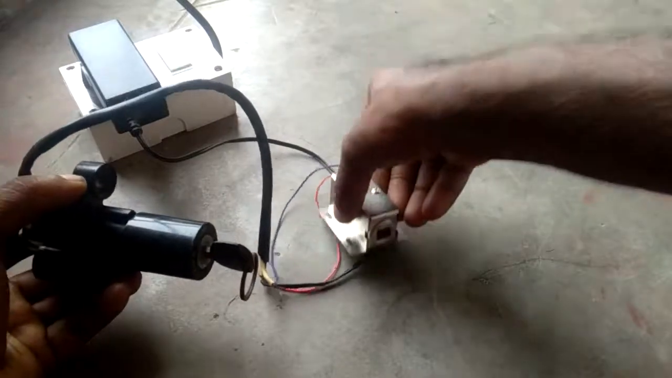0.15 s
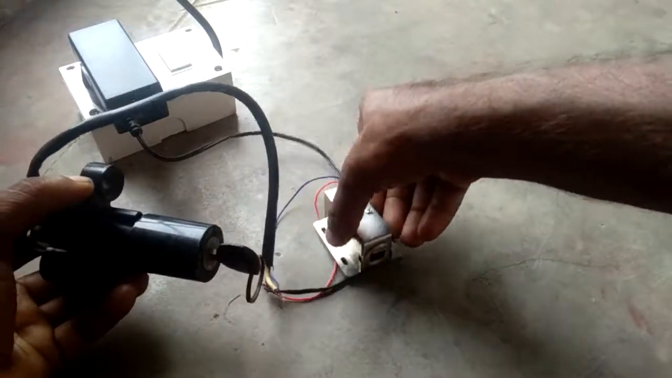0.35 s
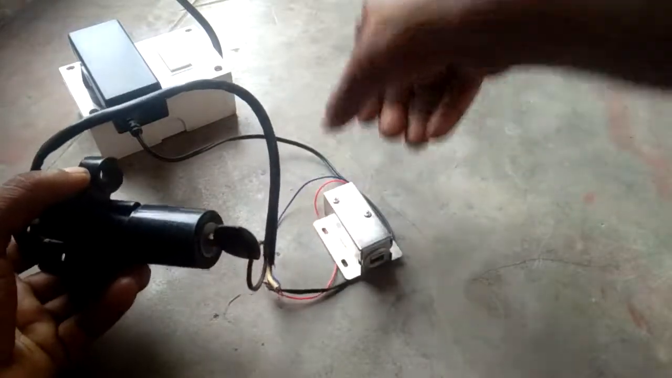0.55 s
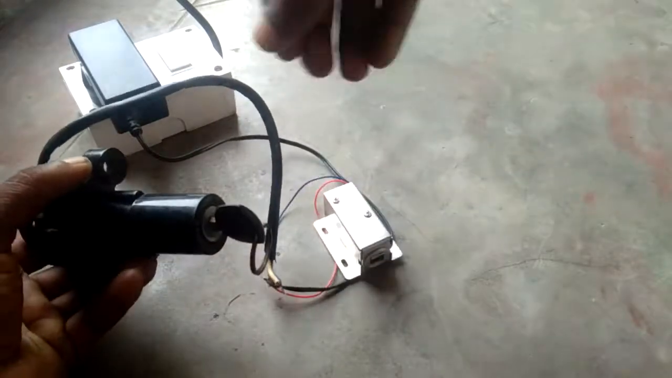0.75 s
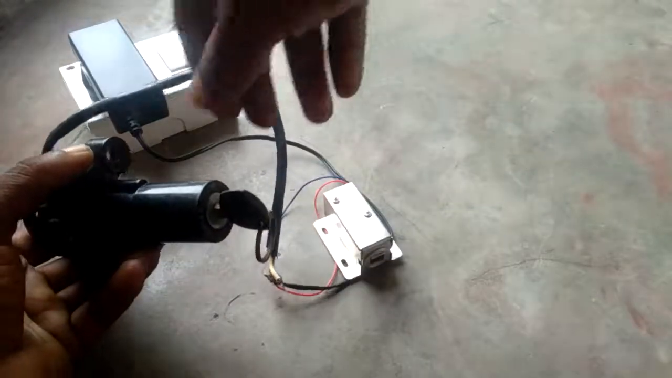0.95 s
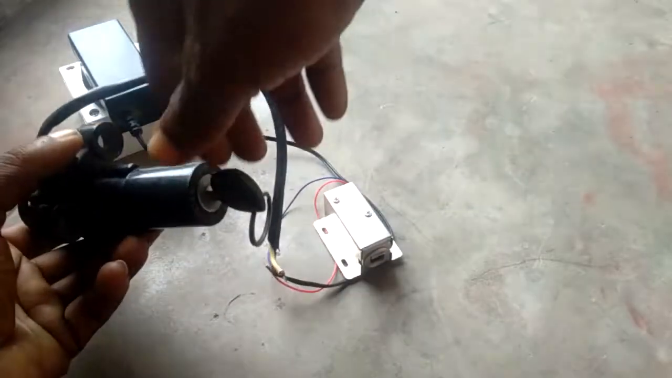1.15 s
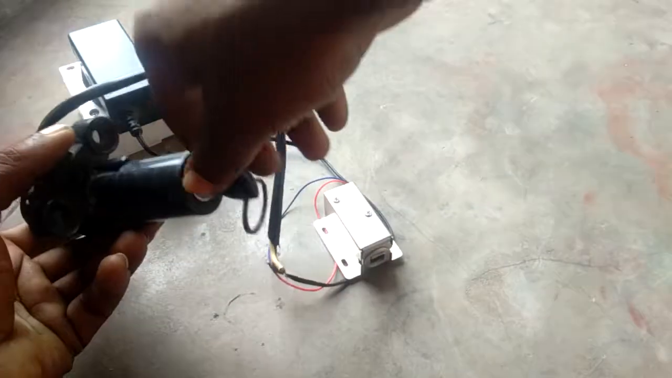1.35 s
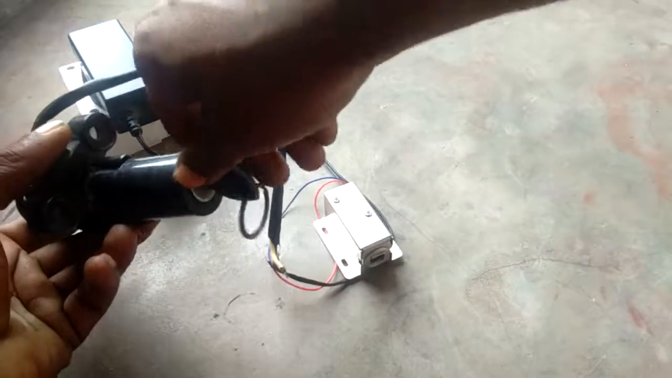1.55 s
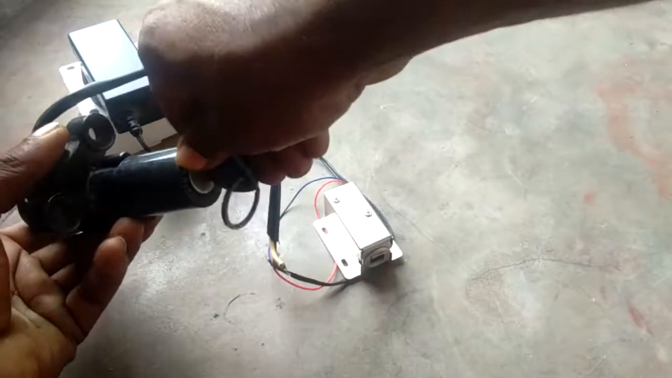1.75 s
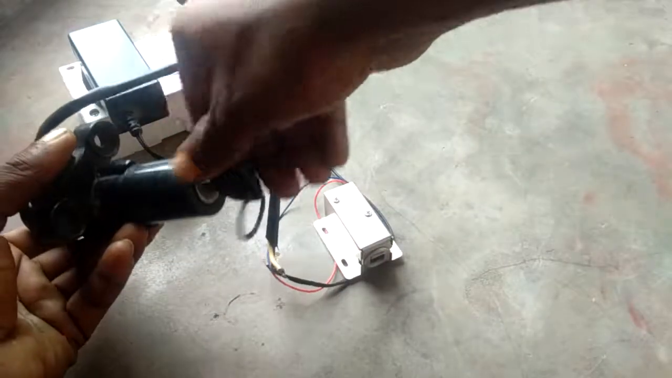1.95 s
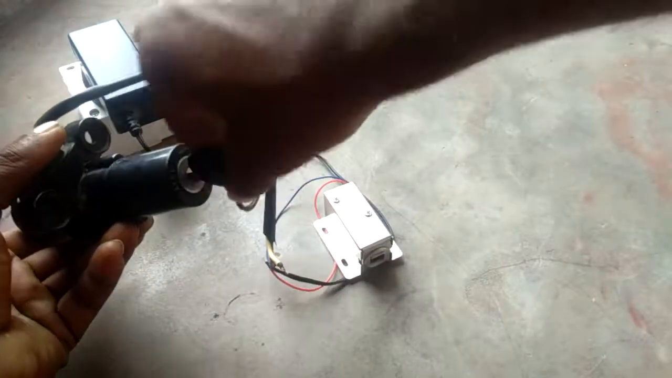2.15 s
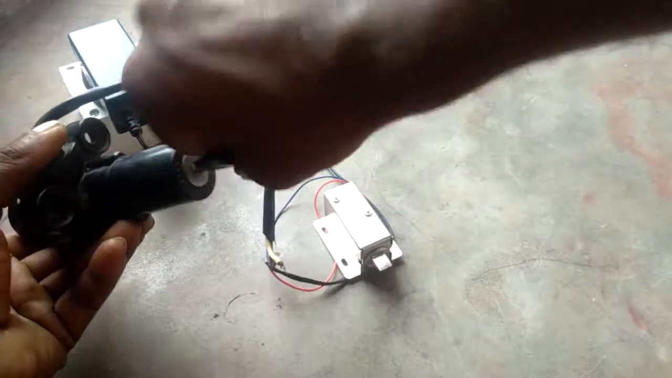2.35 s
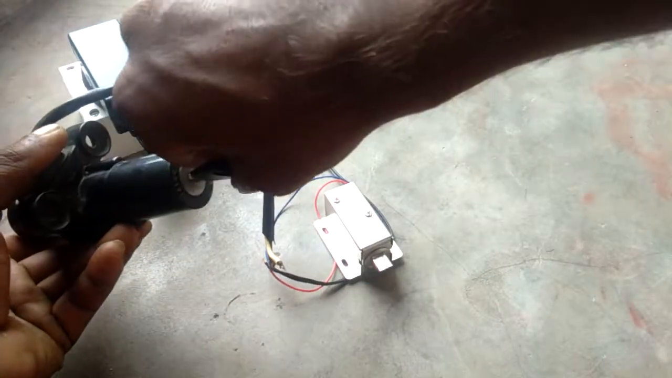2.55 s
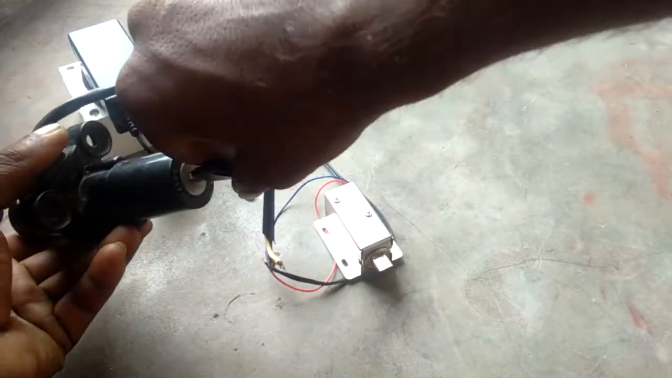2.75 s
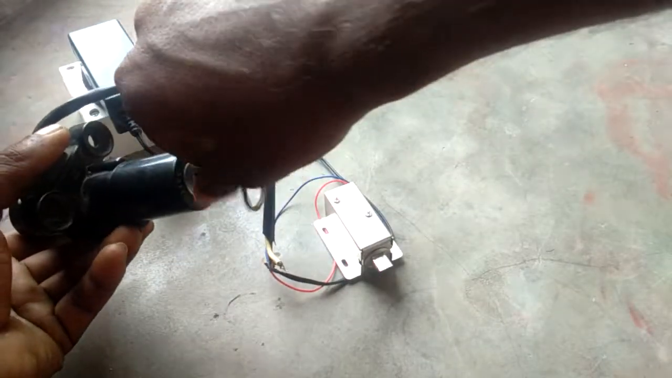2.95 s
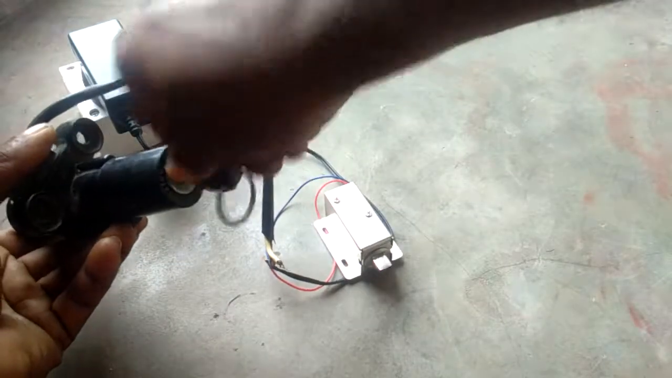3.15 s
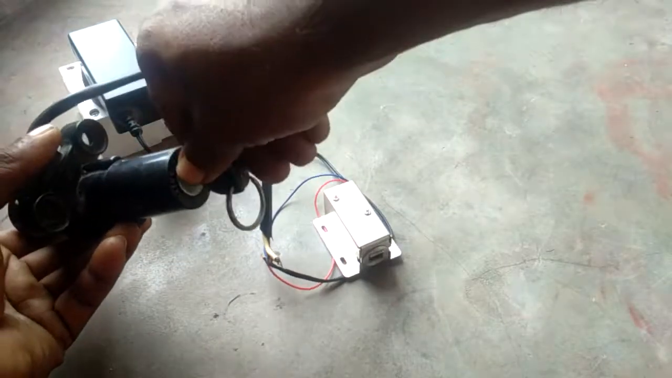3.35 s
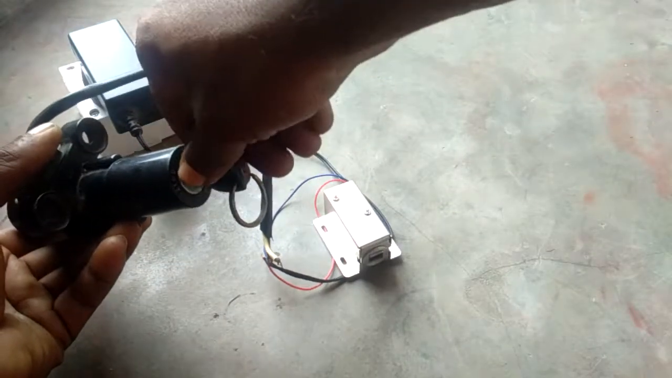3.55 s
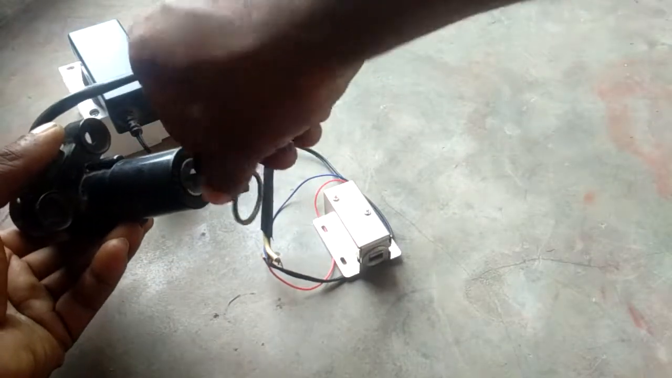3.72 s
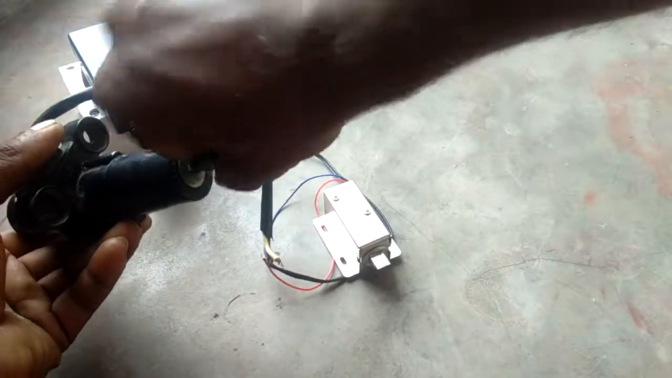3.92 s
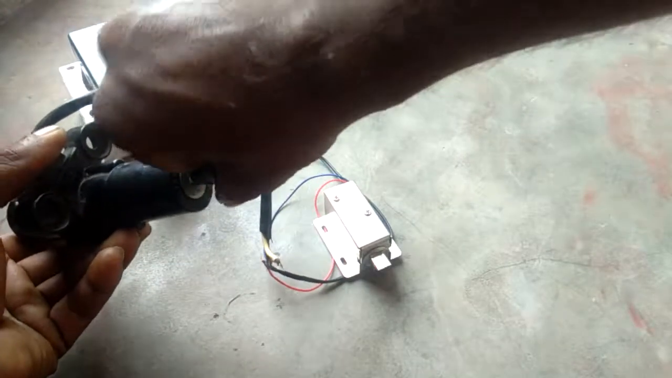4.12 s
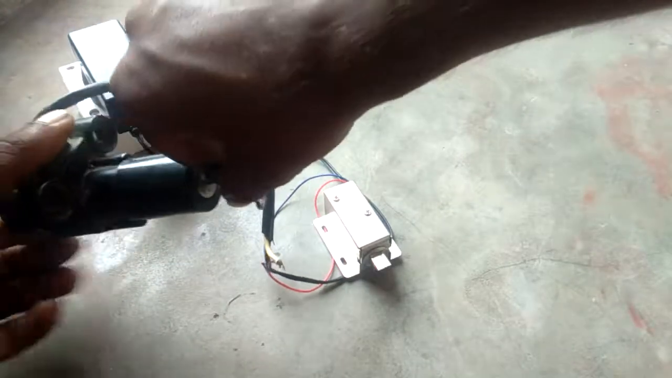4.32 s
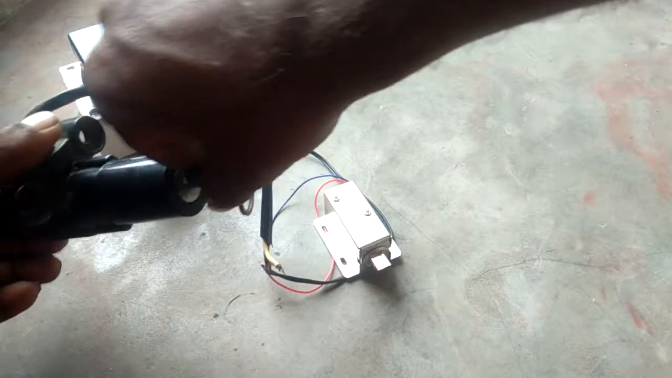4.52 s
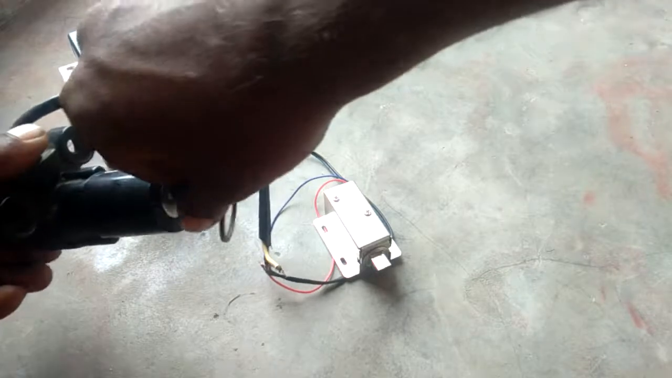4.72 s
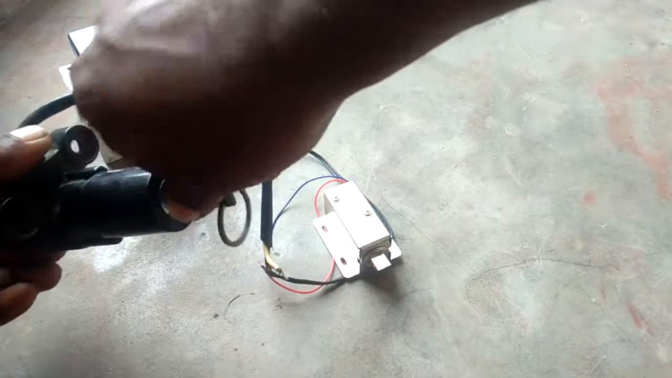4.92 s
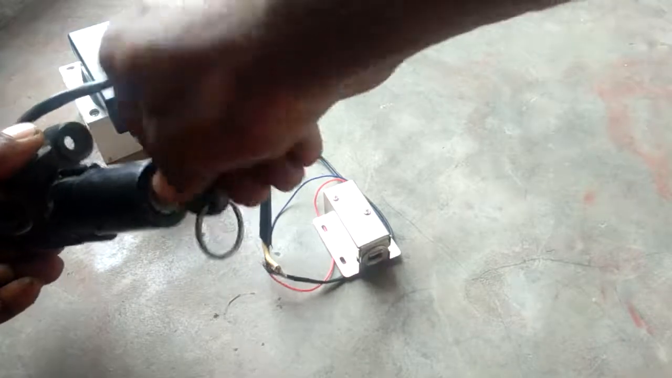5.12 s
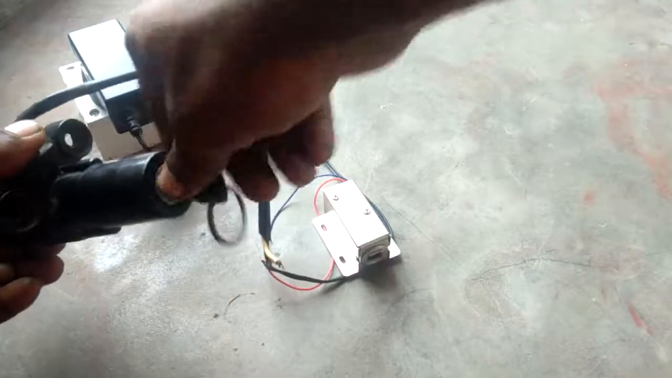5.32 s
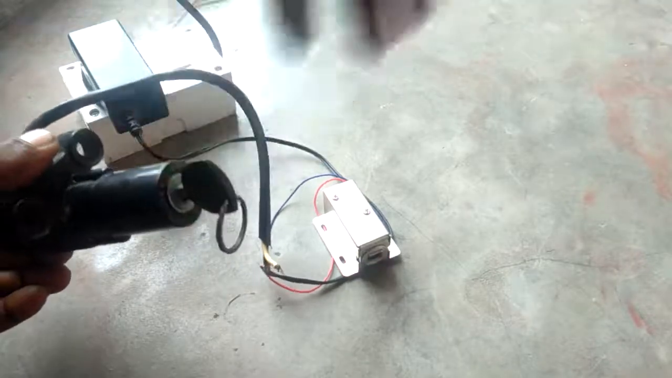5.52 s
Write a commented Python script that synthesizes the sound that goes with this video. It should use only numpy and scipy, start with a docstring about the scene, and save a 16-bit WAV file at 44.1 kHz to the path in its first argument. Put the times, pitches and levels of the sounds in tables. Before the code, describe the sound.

A small metal solenoid lock is set down on concrete, then its bolt snaps out and in twice with sharp clacks over a fan's hum.

```python
"""A fan-like rush (shaped noise) and a wavering mains hum (sines with random swing) run throughout.
A small solenoid lock is set down on a concrete floor, then a faint far tone swells and fades.
A key switch is turned off and on twice: it ticks (noise through barrel resonances), and a moment later
the bolt springs out or slams in, ringing the steel case (decaying modes and a crack) in a bare room."""
import sys
import numpy as np
from scipy import signal
from scipy.fft import rfft, irfft, next_fast_len
from scipy.io import wavfile
from scipy.ndimage import uniform_filter1d, map_coordinates

SR = 44100
rng = np.random.default_rng(int(sys.argv[2]) if len(sys.argv) > 2 else 0)


def waveform_to_disk(signal):
    """Save audio, clipped to [-1, 1], as 16-bit WAV at the path in sys.argv[1]."""
    frames = np.transpose(np.atleast_2d(signal))
    scaled = np.clip(frames, -1, 1) * 32767
    samples = np.round(scaled).astype(np.int16)
    wavfile.write(sys.argv[1], SR, samples)


def linear_from_db(decibels):
    """Turn decibels (scalar or array-like) into linear amplitude factors; 0 gives 1."""
    return 10 ** (np.asarray(decibels, float) / 20)


N = 250488
T = np.arange(N) / SR

# ringing of the lock case: (frequency [Hz], t60 before RING_SHARE [s],
# level struck by bolt springing out [dB], by bolt slamming in [dB], by floor [dB])
CASE_MODES = [(1020, 0.016, -21, -16.5, -4), (1756, 0.0077, -6, -0.5, 6), (2346, 0.05, 2, -6, -21),
              (2424, 0.052, 3, -1.5, -7), (2798, 0.024, -1, -4.5, 4), (3340, 0.24, -14.5, -10.5, -16),
              (3422, 0.12, -11, -10, -9), (3447, 0.035, -1, -0.5, 0), (3920, 0.03, -24, -17, -14),
              (4320, 0.028, -3, -6.5, -20), (4470, 0.057, -24, -1.5, -15), (5145, 0.024, -34, -12, -19),
              (5570, 0.072, -11, -3.5, -22), (5970, 0.024, -19, 1, -19), (6220, 0.033, -18, -0.5, -7.5),
              (6660, 0.054, -13.5, -7.5, -25), (7160, 0.02, -23, 1, -14), (7970, 0.02, -11, -3.5, -3),
              (8930, 0.064, -11, -5.5, -12), (10120, 0.01, -22, -16, -23), (10600, 0.024, -18.5, -7.5, -13),
              (10640, 0.029, -18.5, -13, -4), (11700, 0.032, -8, -3.5, 2.5), (12420, 0.024, -8, -2, -12),
              (13400, 0.027, -6, -11, 0), (14550, 0.03, -13, -11, -3), (14400, 0.027, -12, -5, -10)]
# where the case is struck, in the order of its level columns
PLACES = ["out", "in", "floor"]
# crack of a contact, by place: (level against the ring [dB], t60 [s])
CRACK = {"out": (-22.5, .0115), "in": (1.1, 0.0082), "floor": (6, 0.0076)}
# share of each mode's t60, by place [1]; the fingers damp the case as it is set down
RING_SHARE = {"out": 1.02, "in": 0.96, "floor": 0.67}
# strokes of the bolt: (landing time [s], way, blow [dB], first snap of key switch [dB], second snap [dB])
STROKES = [(2.4982, "out", -19, -20, -21.5), (3.3233, "in", -17.5, -25, -26),
           (4.0609, "out", -18, -21, -18.5), (5.257, "in", -17.5, -28, -17)]
# bolt travel time, by way [s]
TRAVEL_S = {"out": .0173, "in": .0277}
# chatter of a landing, by way: (time after landing [s], level against the blow [dB], brightness [dB/octave])
CHATTER = {"out": [(0, -4, 0.5), (.002, 0.9, -1), (.0055, -9.5, -1), (.016, -7, -.4)], "in": [(0, 1, 1.1),
           (.0026, -3.5, -6), (.0045, -10, -0.5), (.007, -8, -0.3), (.017, -15.5, -3)]}
# lock touching the floor: (time [s], level [dB], brightness [dB/octave])
FLOOR_TAPS = [(0.304, -48, -3), (.3427, -51, -4.5), (.3575, -52, -7), (0.3726, -38.5, 0.7),
              (0.3743, -43, -6), (.3822, -42.5, -2), (0.3888, -43, -1.8), (.393, -56, -5), (.521, -63, -6),
              (.5757, -48, -5)]
# resonances of the switch barrel: (frequency [Hz], width [Hz], level [dB])
BARREL_MODES = [(1740, 400, 0.5), (2400, 124, 12.5), (5500, 550, 2), (6920, 810, -0.5), (10570, 3500, -12),
                (13600, 2200, -12)]
# friction while the bolt travels, by way: level before grit flutter [dB]
SLIDE_DB = {"out": -47, "in": -46.5}
# decay of the room: (frequency [Hz], t60 [s])
ROOM_T60 = [(1000, 0.3), (2500, 0.47), (5000, 0.5), (10000, 0.4), (15000, .25)]
# spectrum of the rush, before scaling to RUSH_DB: (frequency [Hz], relative density [dB])
RUSH_SPECTRUM = [(13, -61), (25, -29), (60, -7.5), (105, -8), (174, -11.5), (236, -14.5), (554, -16.5),
                 (710, -24), (815, -19), (1230, -20), (2600, -33), (6440, -48), (8720, -56), (14700, -58),
                 (16000, -61.5)]
# mains hum and drones: (frequency [Hz], rms before throb [dB], wavering width [Hz],
# steady share of power [0-1], throb depth [0-1])
HUM_LINES = [(50.7, -63, 7.8, 0.7, 0.1), (64.9, -58.5, 5, .6, 0.12), (100.9, -44, 6, 0.94, 0.67),
             (111.9, -51, 8, 0.35, 0.05), (150.7, -59, 9.9, 0.49, 0.), (200.1, -50.5, 10, .5, 0.01),
             (211.2, -53.5, 5.7, 0.89, 0.), (610, -54, 130, 0., 0.)]

SNAP_GAP_S, SNAP_S = 0.0035, 0.0021  # between the two snaps; full scrape of each, before its decay
CREEP_S, CREEP_DB = 0.006, -49  # the key rubs before it turns the current off; level before flutter
ROOM_DB = -7.0
TONE_PEAK_S, TONE_DB = 1.28, -51.5  # level before fuzz
TONE_HZ, TONE_SAG_HZ_PER_S = 1870, 320  # pitch at the peak; how it sags to either side
TONE_RISE_DB_PER_S, TONE_HOLD_S, TONE_FADE_DB_PER_S = 150, 0.08, 70
RUSH_DB = -45.5  # rms in the 300-1000 Hz band
THROB_HZ = 5.1  # the fan's turning beats in the hum


def unit(x):
    """Scaled to rms 1."""
    return x / np.sqrt(np.mean(x ** 2) + 1e-20)


def along(points, hz):
    """(Hz, value) points read on a log axis."""
    point_hz, value = np.transpose(points)
    return np.interp(np.log(hz + 1), np.log(point_hz + 1), value)


def filtered(x, response):
    """x through a complex response of frequency."""
    size = next_fast_len(len(x) + 8192)
    return irfft(rfft(x, size) * response(np.fft.rfftfreq(size, 1 / SR)), size)[:len(x)]


def wobble(rate_hz):
    """Smooth random curve of rms 1."""
    return unit(map_coordinates(rng.standard_normal(N // 50), [T * rate_hz + 2]))


def tilt(hz, db_per_octave):
    """Gain that pivots about 4 kHz."""
    return linear_from_db(db_per_octave * np.log2((hz + 1) / 4000))


def bass_cut(hz, corner_hz):
    """Second-order high-pass response."""
    return (1j * hz / (1j * hz + corner_hz)) ** 2


def add(track, time_s, sound):
    """Mixes a sound in at time_s."""
    part = track[round(time_s * SR):][:len(sound)]
    part += sound[:len(part)]


def blows():
    """Each contact rings the case modes afresh and cracks briefly."""
    track, t, modes = np.zeros(N), T[:SR // 4], np.array(CASE_MODES)
    hz, t60_s = modes[:, :1], modes[:, 1:2]
    # loose parts buzz against the case and blur each mode, the high ones most
    blur_hz = np.minimum(0.03 * (hz / 1000) ** 5, 350)
    contacts = [(time_s, "floor", db, slope_db) for time_s, db, slope_db in FLOOR_TAPS]
    for land_s, way, blow_db, *_ in STROKES:
        for late_s, relative_db, slope_db in CHATTER[way]:
            contacts.append((land_s + late_s, way, blow_db + relative_db, slope_db))
    for time_s, place, db, slope_db in contacts:
        crack_db, crack_t60_s = CRACK[place]
        chance = rng.standard_normal((len(modes), 2))  # level [dB], half phase [rad]
        mode_db = modes[:, [2 + PLACES.index(place)]] + chance[:, :1]
        decay_db = -60 * t / (t60_s * RING_SHARE[place])
        size = linear_from_db(mode_db + decay_db) * tilt(hz, slope_db)
        drift = np.cumsum(rng.standard_normal(size.shape), axis=1) * np.sqrt(2 * np.pi * blur_hz / SR)
        ring = np.sum(size * np.sin(2 * np.pi * hz * t + 2 * chance[:, 1:] + drift), axis=0)
        ring = ring * (1 - np.exp(-t / 0.0002))
        crack = linear_from_db(crack_db - 60 * t / crack_t60_s) * rng.standard_normal(len(t))
        # a small object radiates no bass
        crack = filtered(crack, lambda f: bass_cut(f, 1500) * tilt(f, slope_db))
        add(track, time_s, linear_from_db(db) * (ring + crack))
    return track


def barrel(hz):
    """Sum of barrel resonances with alternating sign."""
    total = 0
    for k, (center_hz, width_hz, db) in enumerate(BARREL_MODES):
        damping = 1j * hz * width_hz
        total = total + (-1) ** k * linear_from_db(db) * damping / (center_hz ** 2 - hz ** 2 + damping)
    return total


def key_switch():
    """Two noise scrapes ring the barrel before each stroke, a dull snap then a brighter one."""
    track, t = np.zeros(N), T[:SR // 20]
    scrape = np.clip(t / 0.0006, 0, 1) * np.exp(-np.clip(t - SNAP_S, 0, 1) / 0.0012)
    for land_s, way, _, first_db, second_db in STROKES:
        for late_s, db, slope_db in [(0, first_db, -0.8), (SNAP_GAP_S, second_db, 0.3)]:
            noise = scrape * rng.standard_normal(len(t))
            snap = filtered(noise, lambda f: barrel(f) * tilt(f, slope_db))
            add(track, land_s - TRAVEL_S[way] + late_s, linear_from_db(db) * snap)
    return track


def slides():
    """Friction of moving parts: bright noise with gritty flutter."""
    spans = []
    for land_s, way, *_ in STROKES:
        start_s = land_s - TRAVEL_S[way]
        spans.append((start_s, land_s, SLIDE_DB[way]))
        if way == "out":
            spans.append((start_s - CREEP_S, start_s, CREEP_DB))
    level = np.zeros(N)
    for a, b, db in spans:
        level += linear_from_db(db) * np.interp(T, [a, a + 0.0022, b, b + 0.0022], [0, 1, 1, 0])
    grit = filtered(rng.standard_normal(N), lambda f: bass_cut(f, 2500) * tilt(f, -1.5))
    return level * linear_from_db(3.6 * wobble(400)) * unit(grit)


def room(x):
    """Diffuse answer of bare walls, each frequency dying at its own speed; a new tail each half second."""
    wet, step = np.zeros(N), SR // 2
    for start in range(SR // 5, N, step):
        hz, t, z = signal.stft(rng.standard_normal(SR // 2), SR, nperseg=256)
        decay = linear_from_db(-60 * t / along(ROOM_T60, hz)[:, None])
        tail = signal.istft(z * decay, SR, nperseg=256)[1]
        tail = tail * np.clip(np.arange(len(tail)) / SR / 0.0041, 0, 1)  # reflections build up
        tail = tail / np.linalg.norm(tail)
        add(wet, start / SR + 0.003, signal.fftconvolve(x[start:start + step], tail))
    return wet


def far_tone():
    """Faint, fuzzy far tone: swells, holds and fades; pitch climbs to the level peak, then sags."""
    since_s = T - TONE_PEAK_S
    rise_db = TONE_RISE_DB_PER_S * np.minimum(since_s, 0)
    fade_db = TONE_FADE_DB_PER_S * np.maximum(since_s - TONE_HOLD_S, 0)
    pitch_hz = TONE_HZ - TONE_SAG_HZ_PER_S * np.clip(np.abs(since_s), 0, 1)
    phase = 2 * np.pi * np.cumsum(pitch_hz) / SR
    fuzz = 0.8 + 0.7 * (wobble(200) + 1j * wobble(200))
    return linear_from_db(TONE_DB + rise_db - fade_db) * np.real(fuzz * np.exp(1j * phase))


def rush():
    """Steady air noise whose level varies in slow patches of time and frequency."""
    z = signal.stft(rng.standard_normal(N), nperseg=512)[2]
    patches = uniform_filter1d(rng.standard_normal(z.shape), size=6, axis=0)
    patches = uniform_filter1d(patches, size=16, axis=1)
    air = signal.istft(z * linear_from_db(0.92 * unit(patches)), nperseg=512)[1][:N]
    air = filtered(air, lambda f: linear_from_db(along(RUSH_SPECTRUM, f)))
    band = filtered(air, lambda f: (f > 300) & (f < 1000))
    return linear_from_db(RUSH_DB) * air / np.std(band)


def hum():
    """Lines with a steady and a randomly swinging part, throbbing with the fan's turning."""
    sound = np.zeros(N)
    turning = 2 * np.pi * THROB_HZ * T + 2.6 + 0.3 * wobble(0.95)
    for hz, db, width_hz, steady, throb in HUM_LINES:
        share = np.clip(steady, 0, 1)
        carrier = np.exp(2j * np.pi * hz * T)
        waver = wobble(width_hz) + 1j * wobble(width_hz)
        swing = np.sqrt(2 * share) + np.sqrt(1 - share) * waver
        sound += linear_from_db(db) * (1 + throb * np.sin(turning)) * np.real(swing * carrier)
    return sound


def scene():
    """Lock and switch near the microphone, in the room, over the far tone, rush and hum."""
    near = blows() + key_switch() + slides()
    return (near + linear_from_db(ROOM_DB) * room(near) + far_tone() + rush() + hum())[None]


def top_cut(x):
    """Nothing passes above the cut-off."""
    return signal.sosfilt(signal.butter(12, 16810, fs=SR, output="sos"), x)


def record(dry):
    """The recorder cuts steeply above 15.5 kHz, down to -25 dB."""
    mix = filtered(dry[0], lambda f: linear_from_db(-np.clip((f - 15550) / 8, 0, 25)))
    return top_cut(mix[None])


dry = scene()
out = record(dry)
waveform_to_disk(out)
```